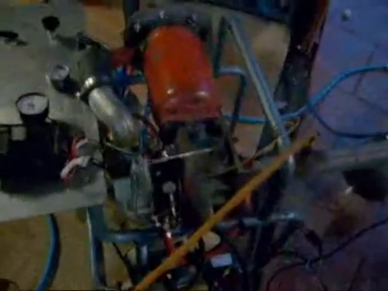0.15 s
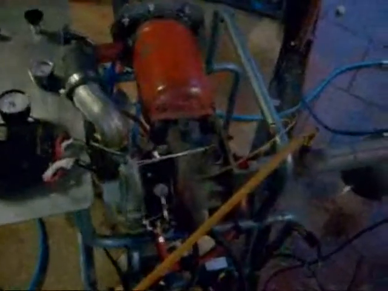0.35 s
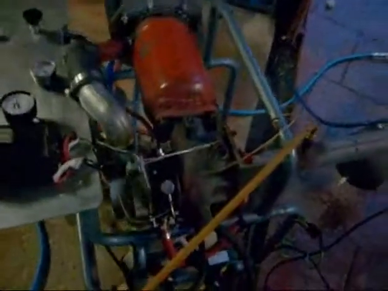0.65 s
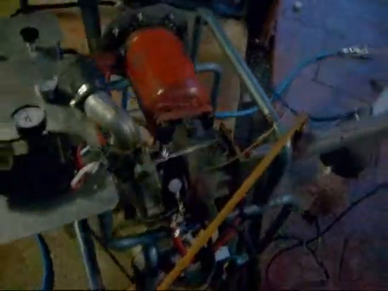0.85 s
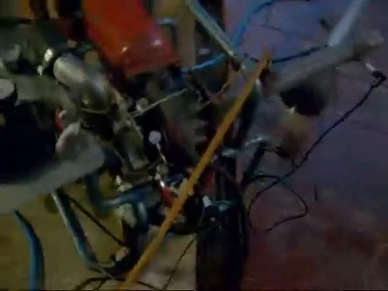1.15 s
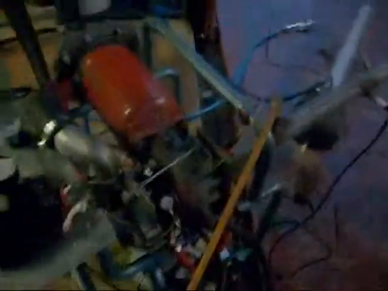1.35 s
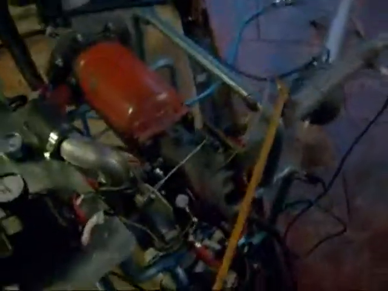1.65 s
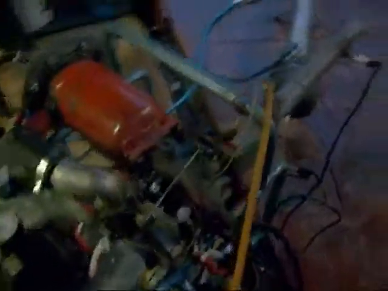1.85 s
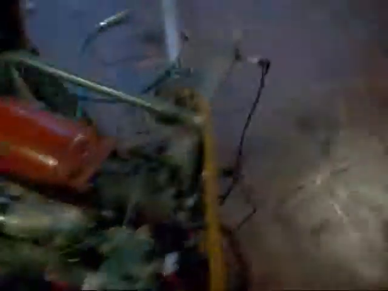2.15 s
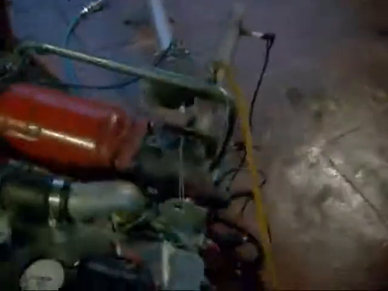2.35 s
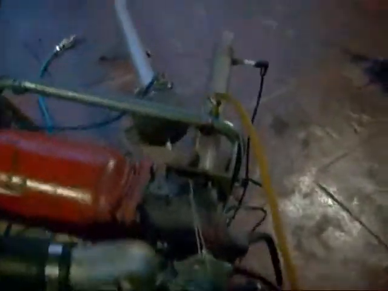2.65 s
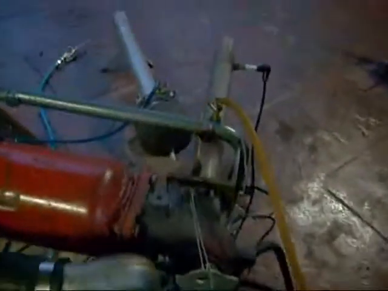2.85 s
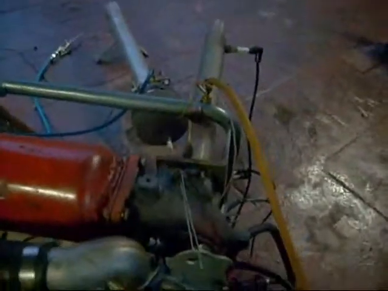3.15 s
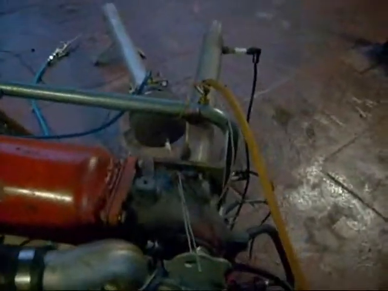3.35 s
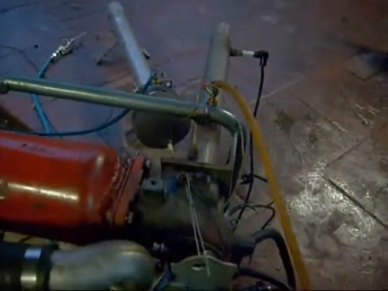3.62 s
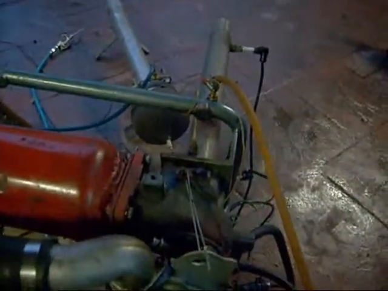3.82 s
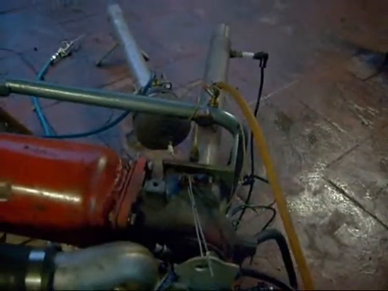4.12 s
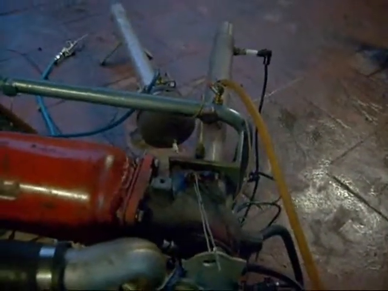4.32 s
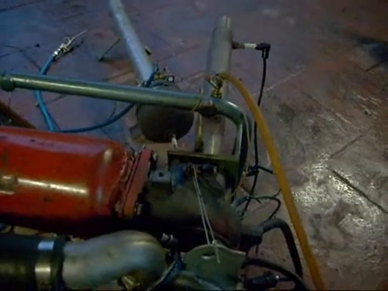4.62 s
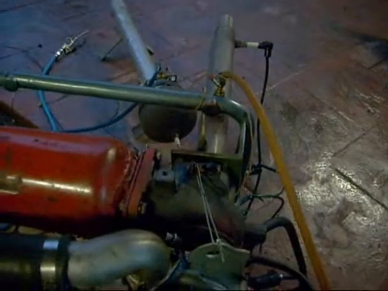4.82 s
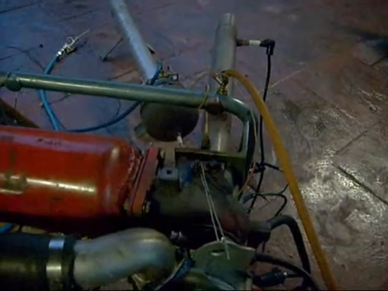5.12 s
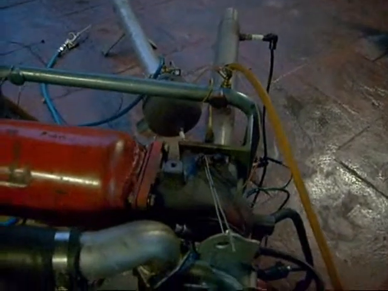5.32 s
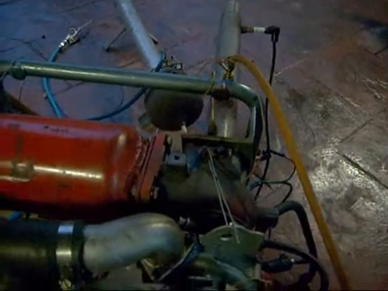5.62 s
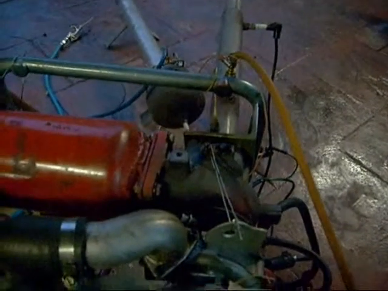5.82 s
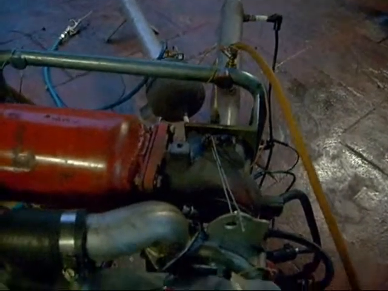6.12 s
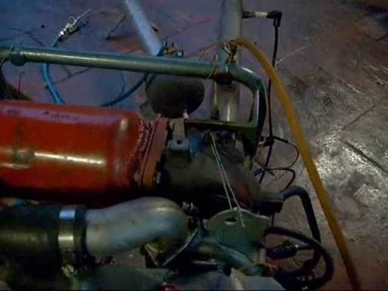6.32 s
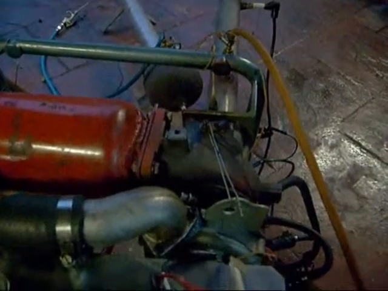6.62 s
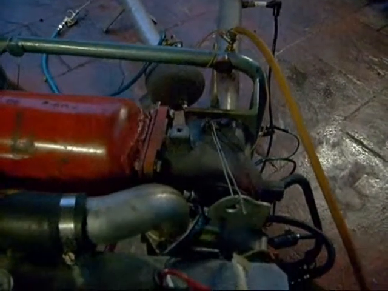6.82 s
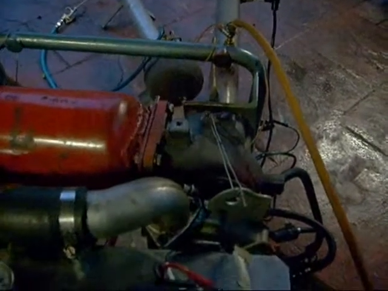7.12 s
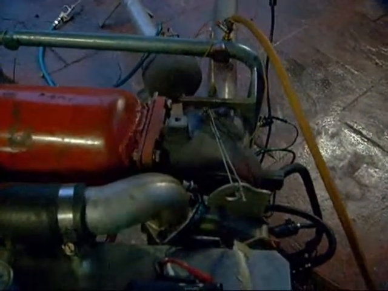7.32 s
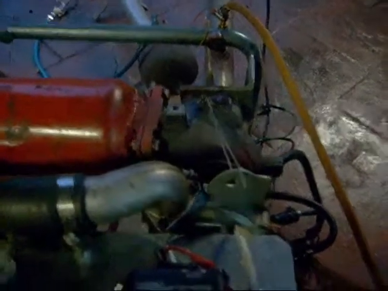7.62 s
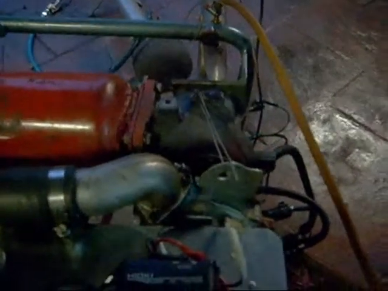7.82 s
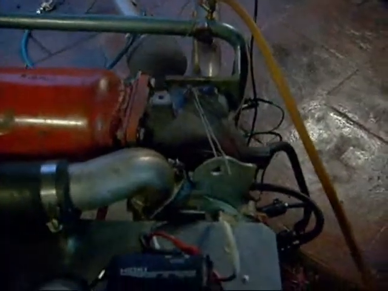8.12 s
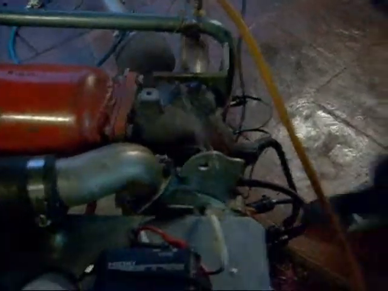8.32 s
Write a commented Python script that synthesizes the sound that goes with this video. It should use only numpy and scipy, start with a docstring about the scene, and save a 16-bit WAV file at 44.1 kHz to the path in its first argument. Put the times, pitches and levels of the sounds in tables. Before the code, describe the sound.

A homemade jet engine roars harshly with a piercing hiss and crackle in a bare shed, then winds down to a thin pump whir.

```python
"""Shed jet engine, run and coast-down

A turbocharger-built jet engine roars in a shed while the microphone moves from burner can to exhaust.
Gusty filtered noise rings pipe and shed resonances, pulses make the crackle, sines the thin blade whines.
The fuel is cut, the rotor coasts down and the harmonics of an electric oil pump grow louder.
The loudest peaks overload the recorder, with bright clicks of high noise."""
import sys
import numpy as np
from scipy import signal
from scipy.fft import rfft, irfft, next_fast_len
from scipy.io import wavfile
from scipy.ndimage import uniform_filter1d

SR = 44100
rng = np.random.default_rng(int(sys.argv[2]) if len(sys.argv) > 2 else 0)


def wrap_up_sound(samples):
    """Save the sound to the file named by the first command line argument, as 16-bit audio."""
    columns = np.atleast_2d(samples).T
    # keep every value between -1 and 1, then stretch to whole-number steps
    tamed = np.clip(columns, -1, 1)
    steps = np.round(tamed * 32767).astype(np.int16)
    wavfile.write(sys.argv[1], SR, steps)


N = 373075

# Microphone position. Each row: time in seconds, share of the sound heard from the exhaust end 0-1.
VIEWPOINT = [(0, 0.15), (1.7, 0), (2.3, 0.27), (2.8, 0.7), (3.3, 0.99), (8.46, 0.98)]
# Pipe and shed resonances at the exhaust. Each row: centre in Hz, width in Hz, lift in dB.
EXHAUST_RESONANCES = [(322.4, 109, 13.6), (411, 67, 4.1), (880, 20, 1.5), (980, 25, 2.4), (1359, 75, 5.3),
                      (1644, 91, 5.8), (1974, 67, 8.2), (2203, 27, 6.2), (2567, 545, 9.35), (2818, 69, 6.8),
                      (3020, 170, 6.4), (3343, 220, 11.7), (3592, 36, 7.8), (3775, 570, 9.9),
                      (4250, 160, 3.7), (4520, 96, 5.8), (4760, 84, 3.3), (4925, 110, 7.8),
                      (5261, 180, 8.1), (5380, 35, 4.5), (5870, 310, 7.2), (6240, 320, 2.7)]
# The same for the coasting engine. Each row: centre in Hz, width in Hz, lift in dB.
COAST_RESONANCES = [(543, 29, 11.3), (578, 110, 10), (715, 51, 3.1), (1120, 29, 3.5), (1223, 14, 6.6),
                    (1410, 100, 10.4), (1560, 20, 10.7), (1680, 150, 12.3), (1990, 37, 6.4), (2090, 15, 15),
                    (2270, 20, 3.8), (2340, 24, 6.7), (2555, 120, 5.5), (2836, 37, 12.2), (3070, 19, 12.4),
                    (3400, 30, 4.2), (4000, 33, 9.1), (4480, 190, 9.1), (5015, 77, 4.7), (7638, 650, 5.2)]
# Loudest crackles of the jet. Each row: time in seconds, relative level in dB.
LOUD_CRACKLES = [(0.6604, -13), (0.856, -18), (1.2426, -16), (1.3366, -10), (1.8417, -19), (2.389, -8),
                 (3.5356, -7), (3.5857, -12), (3.9314, -9), (4.1849, -11), (4.8214, -12), (4.8798, -15),
                 (5.1198, -9), (5.1728, -13), (5.3712, -8), (5.6072, -13), (5.8278, -7), (6.0407, -17),
                 (6.2507, -14)]


def undb(db):
    """Decibels to amplitude gain."""
    return 10 ** (np.asarray(db) / 20)


def unit(x):
    """Scale to rms 1."""
    return x / np.sqrt(np.mean(x ** 2))


def curves(table):
    """Each column of a table after the time column, joined by straight lines in time."""
    s, *columns = np.transpose(table)
    return [np.interp(np.arange(N) / SR, s, column) for column in columns]


def walk(rate_hz):
    """Smooth random signal, rms 1; its spectrum is at half amplitude at rate_hz / 2."""
    hz = np.fft.rfftfreq(N, 1 / SR)
    lowpass = 1 / (1 + (2 * hz / rate_hz) ** 2)
    return unit(irfft(rfft(rng.standard_normal(N)) * lowpass, N))


def response(hz, colour, modes):
    """Gain of a broad colour with resonance peaks added in dB."""
    points_hz, points_db = np.transpose(colour)
    db = np.interp(np.log(hz), np.log(points_hz), points_db)
    for centre_hz, width_hz, lift_db in modes:
        db = db + lift_db / (1 + (2 * (hz - centre_hz) / width_hz) ** 2)
    return undb(db)


def piped(x, modes):
    """A sound rung through a set of resonances."""
    hz = np.fft.rfftfreq(N, 1 / SR) + 1  # +1 keeps the log finite
    flat = [(1, 0)]
    return irfft(rfft(x) * response(hz, flat, modes), N)


def blend(a, b, share):
    """Equal-power fade between two unrelated sounds."""
    share = np.clip(share, 0, 1)
    return np.sqrt(1 - share) * a + np.sqrt(share) * b


def swell(peak_s, peak_db, rise_db_per_s, fall_db_per_s):
    """Gain that grows to one peak and dies away, both linear in dB."""
    age_s = np.arange(N) / SR - peak_s
    return undb(peak_db + np.minimum(rise_db_per_s * age_s, -fall_db_per_s * age_s))


def swish(hz, width_hz):
    """Air rushing in a band around a fixed or moving centre, rms 1."""
    phase = 2 * np.pi * np.cumsum(hz * np.ones(N)) / SR
    return walk(width_hz) * np.cos(phase) + walk(width_hz) * np.sin(phase)


def speed():
    """Rotor speed in turns per second: full speed, then the rundown that flow, colour and whines follow."""
    # Each row: time in seconds, turns per second.
    shaft = [(0, 1503.3), (3.05, 1503), (3.4, 1477), (4.42, 1333), (4.92, 1217), (6.2, 905), (6.62, 770),
             (6.97, 669), (7.3, 570), (7.8, 470), (8.46, 375)]
    return curves(shaft)[0]


def above(knee_turns_per_s, fall_db):
    """Share of power: 1 well above a knee speed, falling by fall_db per halving well below it."""
    return 1 / (1 + (knee_turns_per_s / speed()) ** (fall_db / (10 * np.log10(2))))


def exhaust_view():
    """Share of the sound heard from the exhaust end, 0-1."""
    return np.clip(curves(VIEWPOINT)[0], 0, 1)


def shed(x, t60_s, wet_db):
    """Bare floor and walls: a dense, short echo that combs the roar into many fine fixed lines."""
    t = np.arange(SR // 3) / SR
    echo = rng.standard_normal(len(t)) * np.exp(-np.log(1000) * t / t60_s)
    echo *= undb(wet_db) / np.linalg.norm(echo)
    wet = signal.fftconvolve(x, echo)[:N]
    return (x + wet) / np.hypot(1, undb(wet_db))


def drone(hz, orders, wobble):
    """Harmonics of a turning machine whose speed wavers by the rms fraction wobble."""
    phase = 2 * np.pi * np.cumsum(hz * (1 + wobble * walk(11.0))) / SR
    tones = [undb(db) * np.sin(k * phase + 2 * np.pi * rng.random()) for k, db in orders]
    return np.sqrt(2) * sum(tones)


def oil_pump(tooth_hz=371, mains_hz=50):
    """Gear-tooth tone of an electric oil pump plus motor hum; louder late in the rundown, as the mic turns to it."""
    # Each row: multiple of the tooth rate, relative level in dB.
    gear_orders = [(1, -46.5), (2, -44.5), (3, -43), (4, -42), (5, -43), (6, -39), (7, -58)]
    # Each row: multiple of the mains frequency, relative level in dB.
    motor_orders = [(2, -64), (4, -56)]
    # Each row: time in seconds, gain in dB.
    pump_gain = [(0, -19), (6, -12), (7.2, 2.5), (7.8, -2), (8.46, 1)]
    pump = drone(tooth_hz, gear_orders, wobble=0.0013) + drone(mains_hz, motor_orders, wobble=0.0003)
    return pump * undb(curves(pump_gain)[0])


def whine(blades, flares, steady, wobble, fading_db):
    """A blade-passing tone: it wavers with the shaft, flickers in the hot air and flares over a steady gain."""
    t = np.arange(N) / SR
    gain = steady
    for s, length_s, db in flares:  # length: full width at half gain
        gain = gain + undb(db) * np.exp(-np.log(2) * (2 * (t - s) / length_s) ** 2)
    phase = 2 * np.pi * np.cumsum(blades * speed() * (1 + wobble * walk(51))) / SR
    return np.sqrt(2) * np.sin(phase) * gain * undb(fading_db * walk(16))


def wheels(compressor_blades=6, turbine_blades=10):
    """The compressor sings while the rotor is fast; the turbine's tone sinks into hearing as it slows."""
    # Blade tone beams at the microphone. Each row: centre in seconds, length in seconds, level in dB.
    compressor_flares = [(.94, .14, -40), (1.42, .2, -47), (2.36, 0.24, -32.5), (3.33, .2, -33),
                         (4.7, .45, -39.5)]
    # The same for the turbine. Each row: centre in seconds, length in seconds, level in dB.
    turbine_flares = [(6.4, .3, -47), (6.63, .1, -42), (7.0, .14, -43), (7.22, .22, -37)]
    steady = undb(-52) * np.sqrt(above(1500, fall_db=50))
    compressor = whine(compressor_blades, compressor_flares, steady, wobble=0.0011, fading_db=2)
    turbine = whine(turbine_blades, turbine_flares, 0, wobble=0.0012, fading_db=2)
    return compressor + turbine


def passing_rush():
    """A bright rush as the microphone swings past the turbocharger."""
    # Each row: centre in Hz, width in Hz, relative level in dB.
    turbo_bands = [(580, 130, -28), (1560, 280, -23.5), (4340, 700, -17.5)]
    rush = sum(undb(db) * swish(hz, width_hz) for hz, width_hz, db in turbo_bands)
    return rush * swell(peak_s=2.52, peak_db=2.5, rise_db_per_s=50, fall_db_per_s=30)


def nozzle(mid_hz=2870, mid_turns_per_s=640, sink_power=0.33):
    """The nozzle's hiss sinks more slowly than the rotor as pressure falls, and rings the cooling pipes."""
    centre_hz = mid_hz * (speed() / mid_turns_per_s) ** sink_power
    air = piped(swish(centre_hz, width_hz=410), COAST_RESONANCES)
    return air * swell(peak_s=7.37, peak_db=-25.5, rise_db_per_s=5, fall_db_per_s=17)


def rundown(cycles_per_turn=2.6):
    """A hollow swish sinks in step with the rotor and swells at each pipe resonance that it crosses."""
    air = piped(swish(cycles_per_turn * speed(), width_hz=190), EXHAUST_RESONANCES)
    return air * swell(peak_s=6.78, peak_db=-26.5, rise_db_per_s=40, fall_db_per_s=12)


def growl(cycles_per_turn=0.9):
    """A throaty band of roar near the shaft rate comes forward as the rotor slows."""
    air = swish(cycles_per_turn * speed(), width_hz=300)
    return air * swell(peak_s=6.6, peak_db=-27, rise_db_per_s=7, fall_db_per_s=20.5)


def scream(hz=3365, width_hz=60, level_db=-20):
    """A sharp exhaust resonance sings while the flow is fast and the microphone faces it."""
    fast = np.sqrt(above(720, fall_db=30))
    return swish(hz, width_hz) * undb(level_db) * exhaust_view() * fast


def overload_clicks(above_hz=6500, decay_s=0.00097, click_db=-1):
    """Bright, brief clicks of high noise as the loudest peaks overload the recorder."""
    s, db = np.transpose(LOUD_CRACKLES)
    kicks = np.bincount((s * SR).astype(int), undb(db + click_db), N)[:N]
    envelope = signal.lfilter([1], [1, -np.exp(-1 / (decay_s * SR))], kicks)
    band = signal.butter(2, [above_hz, SR / 4], "band", fs=SR, output="sos")
    return signal.sosfilt(band, envelope * rng.standard_normal(N))


def crackle(width_s, reference_db, small_per_s, small_db, spread_db):
    """Surges of a millisecond or two as shocks leave the nozzle; small ones at random, all weaker when slow."""
    chance = rng.random((400, 2))
    small_s = np.cumsum(-np.log(chance[:, 0])) / small_per_s
    small = np.column_stack([small_s, small_db + spread_db * chance[:, 1]])
    s, db = np.vstack([LOUD_CRACKLES, small]).T
    kicks = np.bincount((s * SR).astype(int), undb(db - reference_db), N)[:N]
    kicks = kicks * above(860, fall_db=30)
    age = np.arange(SR // 100) / SR / width_s
    pulse = age ** 2 * np.exp(1 - age ** 2)  # peak 1 after width_s
    return signal.fftconvolve(kicks, pulse)[:N]


def surges(rate_hz, decay_s, spread_db):
    """Puffs at uneven intervals, each rising at once and dying away in the shed; running mean about 1."""
    chance = rng.random((4000, 2))
    at_s = np.cumsum(0.25 + 1.5 * chance[:, 0]) / rate_hz
    kicks = np.bincount((at_s * SR).astype(int), undb(spread_db * chance[:, 1]), N)[:N]
    puffs = signal.lfilter([1], [1, -np.exp(-1 / (decay_s * SR))], kicks)
    return puffs / uniform_filter1d(puffs, SR // 16)


def eddies(colour, modes, gusts, order=16):
    """Gusty turbulence rung through the resonances, in four bands from rumble to hiss, rms 1 each."""
    # Edges between the bands, in Hz.
    crossover_hz = (230, 2300, 5000)
    size = next_fast_len(N)
    hz = np.fft.rfftfreq(size, 1 / SR) + 1
    flow = rfft(rng.standard_normal(N) * gusts, size) * response(hz, colour, modes)
    below = [0 * hz] + [1 / (1 + (hz / edge) ** order) for edge in (*crossover_hz, SR / 4)]
    power_shares = np.abs(np.diff(below, axis=0))
    return np.array([unit(irfft(flow * np.sqrt(share), size)[:N]) for share in power_shares])


def jet(puff_share=0.36, gust_db=0.83, gust_rate_hz=500):
    """Flame and jet: all eddies surge together; level and colour follow viewpoint and rotor speed."""
    # Colour beside the burner, at the exhaust and when coasting. Each row: frequency in Hz, relative dB.
    burner_colour = [(25.0, -31.4), (70.0, -29.5), (200.0, -33.5), (320.0, -20.5), (550.0, -25.5),
                     (1000.0, -26.5), (1800.0, -21), (2600.0, -5.5), (3550.0, 3.5), (4400.0, -8),
                     (5500.0, -14), (7000.0, -17.5), (9000.0, -20.5), (11000.0, -23.5)]
    exhaust_colour = [(25.0, -30), (70.0, -21.5), (200.0, -25.5), (320.0, -25.5), (550.0, -4.5),
                      (1000.0, -6.5), (1800.0, -7), (2600.0, -8), (3550.0, -0.5), (4400.0, -7),
                      (5500.0, -14.5), (7000.0, -12), (9000.0, -14.5), (11000.0, -19.5)]
    coast_colour = [(25.0, -38), (70.0, -38), (200.0, -37), (320.0, -13), (550.0, -18), (1000.0, -10.5),
                    (1800.0, -19), (2600.0, -5.5), (3550.0, 1.5), (4400.0, -17), (5500.0, -24),
                    (7000.0, -31), (9000.0, -38), (11000.0, -42)]
    # Pipe and shed resonances beside the burner. Each row: centre in Hz, width in Hz, lift in dB.
    burner_resonances = [(155, 99, 14.5), (265, 27, 6), (700, 334, 13.5), (1106, 330, 11.5), (1367, 260, 5),
                         (1662, 430, 12.5), (1900, 30, 3), (2028, 190, 9.5), (2300, 200, 5.5),
                         (2800, 140, 3), (5076, 48, -7), (7520, 1000, 7)]
    # Flame rumble, exhaust roar, nozzle rush, fine hiss. Each row: level at the burner in dB, level at the
    # exhaust in dB, knee in turns per second, fall in dB per halving of speed, part in a crackle in dB.
    band_levels = [(-37.5, -39, 940, 19, -8), (-16.5, -17, 615, 19.5, -7), (-10, -9, 620, 30, -6.5),
                   (-26, -25, 940, 15.5, 3)]
    # Slow changes in loudness as the microphone wanders. Each row: time in seconds, gain in dB.
    loudness_drift = [(0, 1), (.9, -0.4), (2.0, 0), (2.9, 0), (3.35, 1.5), (3.9, -0.5), (6.3, 1),
                      (7.0, -0.5), (7.45, 0), (7.8, 0.5), (8.46, 0.5)]

    puffs = surges(rate_hz=105, decay_s=0.0048, spread_db=5)
    gusts = (1 - puff_share + puff_share * puffs) * undb(gust_db * walk(gust_rate_hz))
    view = exhaust_view()
    at_burner = eddies(burner_colour, burner_resonances, gusts)
    at_exhaust = eddies(exhaust_colour, EXHAUST_RESONANCES, gusts)
    burning = blend(at_burner, at_exhaust, view)
    coasting = eddies(coast_colour, COAST_RESONANCES, gusts)
    # cool coasting air takes over from the flame
    flow = blend(burning, coasting, 0.9 * (1 - above(565, fall_db=34)))
    shocks = crackle(width_s=0.0019, reference_db=-18.5, small_per_s=6, small_db=-27.5, spread_db=11)
    out = 0
    for band, (burner_db, exhaust_db, knee, fall_db, shock_db) in zip(flow, band_levels):
        gain = undb(burner_db + (exhaust_db - burner_db) * view) * np.sqrt(above(knee, fall_db))
        out = out + band * gain * (1 + undb(shock_db) * shocks)
    return out * undb(curves(loudness_drift)[0])


def scene():
    """Jet and rushing air echo in the shed; pump, wheel whines and overload clicks are added dry."""
    air = jet() + scream() + growl() + rundown() + nozzle() + passing_rush()
    roar = shed(air, t60_s=0.23, wet_db=-13.5)
    return (oil_pump() + wheels() + overload_clicks() + roar)[None]


def gain_control(x, target_db=-9.0, most_db=1.5, reaction_s=0.0048, strength=0.7):
    """Turns loud moments down within milliseconds and quiet ones up a little, which evens out the roar."""
    pole = np.exp(-1 / (reaction_s * SR))
    power = signal.lfilter([1 - pole], [1, -pole], x ** 2) + 1e-12
    gain_db = strength * (target_db - 10 * np.log10(power))
    return x * undb(np.minimum(most_db, gain_db))


def record(dry, ceiling=0.99, top_hz=15550):
    """The recorder rides its gain, samples at half rate and clips; held samples mirror the treble upward."""
    coarse = np.clip(gain_control(dry)[:, ::2], -ceiling, ceiling)
    held = np.repeat(coarse, 2, axis=1)[:, :N]
    lowpass = signal.ellip(12, 0.1, 70, top_hz, fs=SR, output="sos")
    return signal.sosfilt(lowpass, held)


dry = scene()
out = record(dry)
wrap_up_sound(out)
```